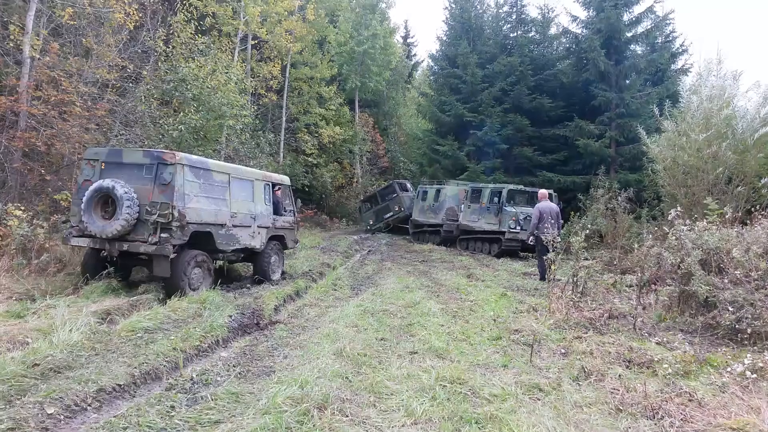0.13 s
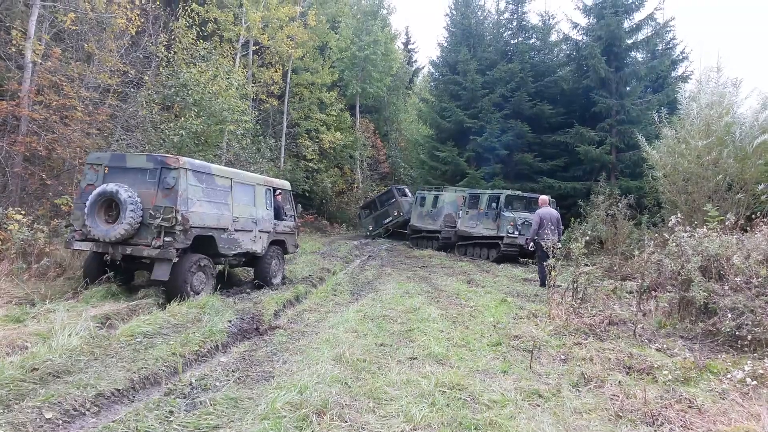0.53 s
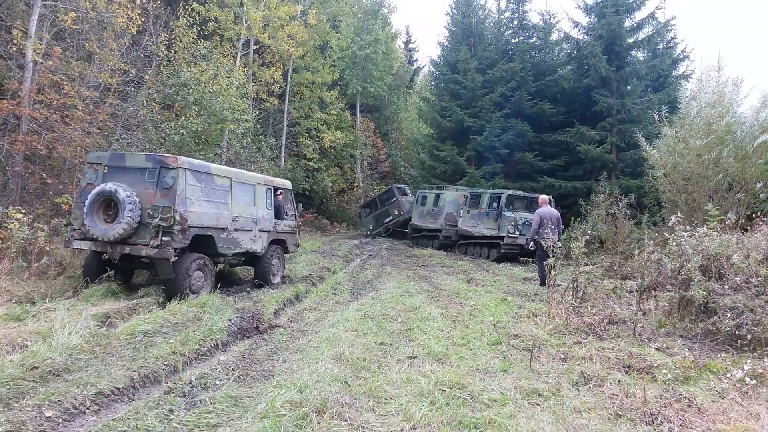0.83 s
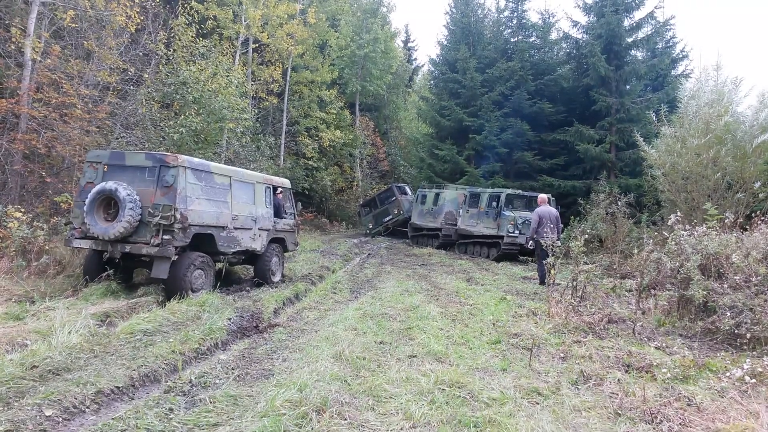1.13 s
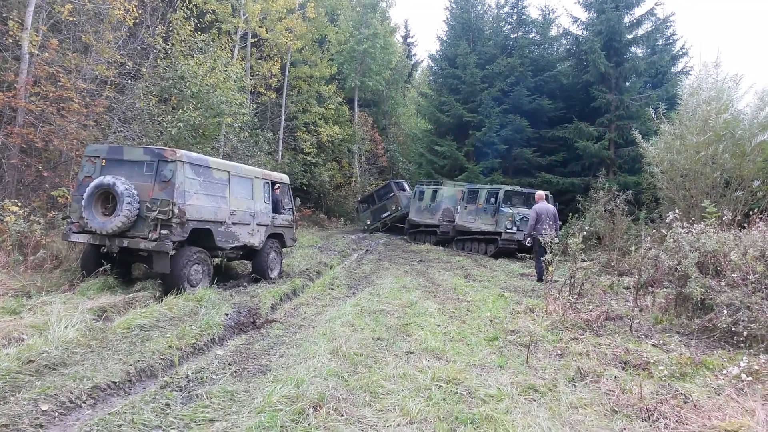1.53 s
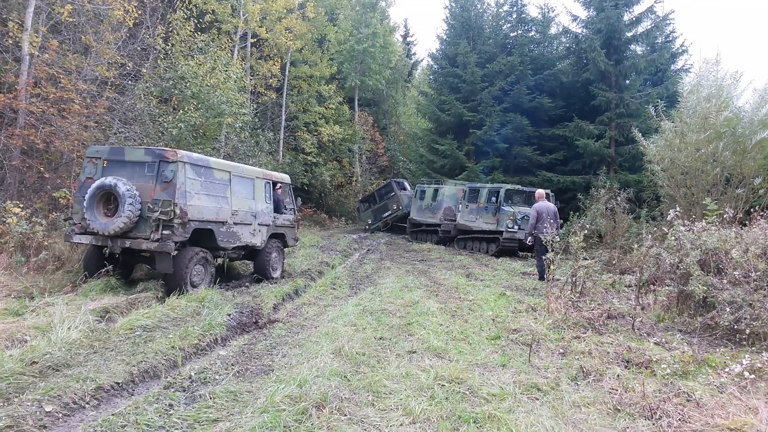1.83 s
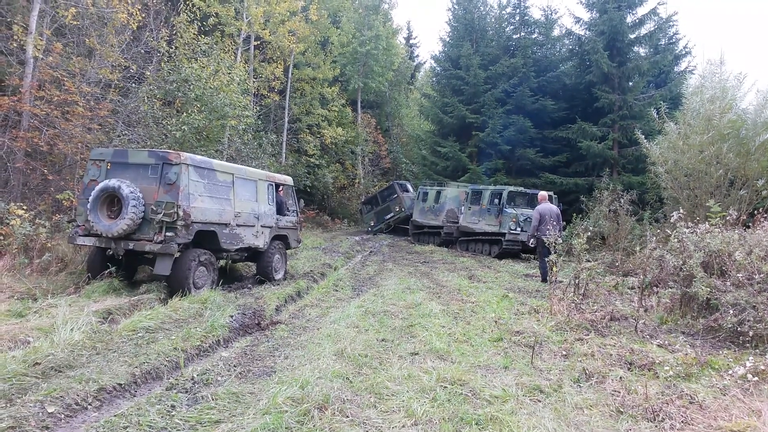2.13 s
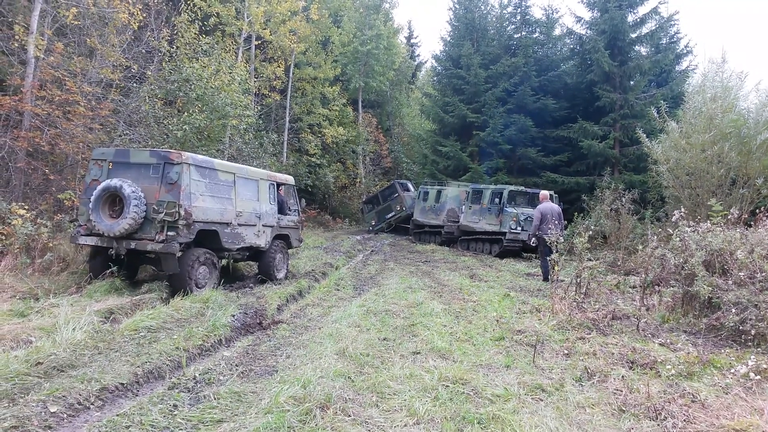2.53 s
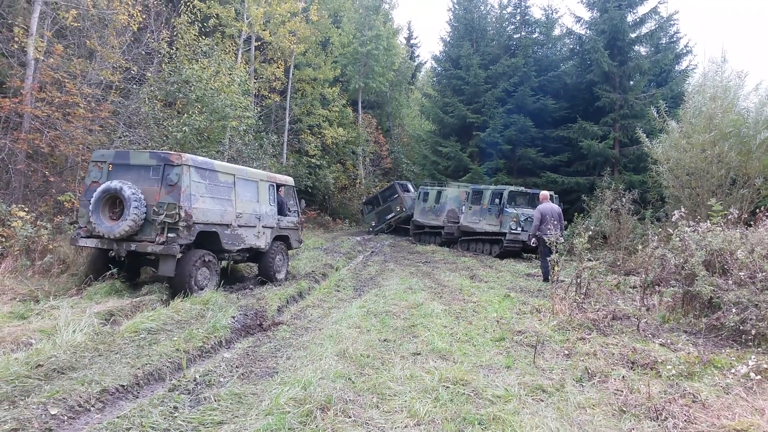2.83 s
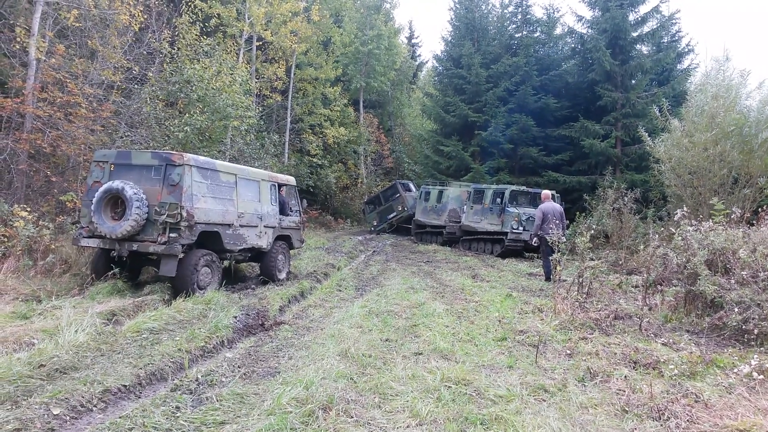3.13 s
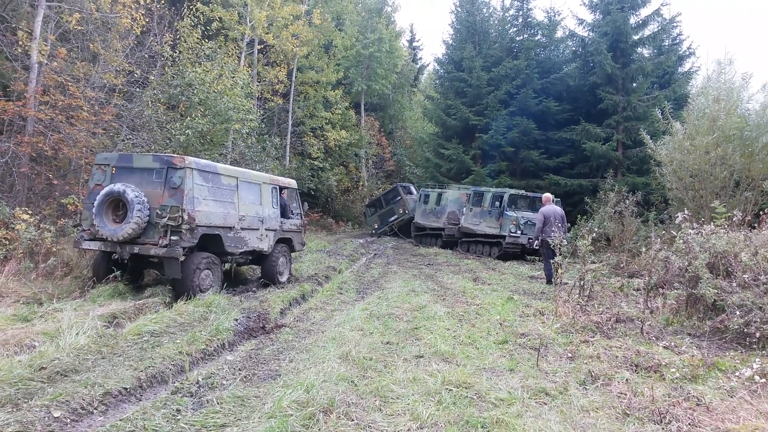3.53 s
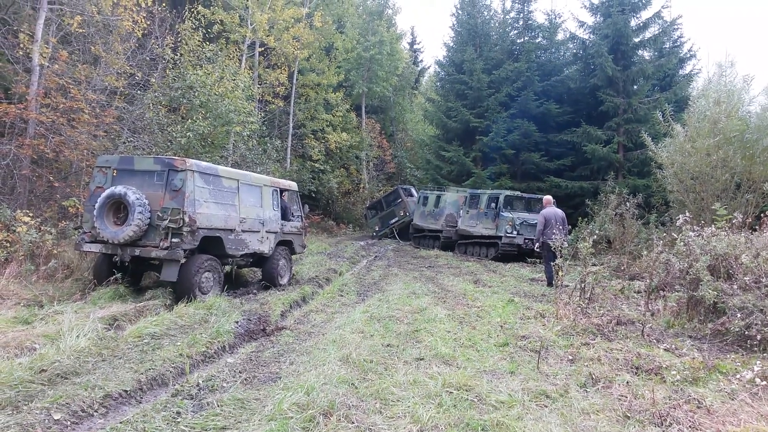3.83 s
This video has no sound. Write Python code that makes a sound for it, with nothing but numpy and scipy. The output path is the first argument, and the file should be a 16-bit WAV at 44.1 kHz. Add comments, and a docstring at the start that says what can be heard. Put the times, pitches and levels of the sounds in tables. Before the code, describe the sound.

Truck engine picks up revs with a deep throbbing exhaust and holds a clattering fast idle.

```python
"""Six-cylinder truck revving up

A six-cylinder truck picks up revs and settles to a fast idle; the sound fades in from silence.
Exhaust puffs ring a pipe, valve ticks ring the engine block, shaped noise makes the fan and intake roar.
One jolt per engine cycle hums in a body panel, and gliding sines swell the bass.
A second engine further off is a few sine orders, under a wide bright hiss that flutters at its rate."""
import sys
import numpy as np
from scipy import signal
from scipy.fft import rfft, irfft, next_fast_len
from scipy.io import wavfile
from scipy.ndimage import map_coordinates

SR = 44100
rng = np.random.default_rng(int(sys.argv[2]) if len(sys.argv) > 2 else 0)


def put_to_file(sound):
    """Save the sound as 16-bit audio at rate SR, in the file named by the first command-line argument."""
    columns = np.atleast_2d(sound).T  # one column per channel
    safe = np.clip(columns, -1, 1)
    whole_steps = np.round(safe * 32767)
    wavfile.write(sys.argv[1], SR, whole_steps.astype(np.int16))


N = 176400  # samples: 4 s

# The truck's cylinders in firing order.
# Each row: strength in dB, delay on the way to the pipe in seconds, both scaled by the unevenness.
CYLINDER_ROWS = [(-0.3, 0.00066), (-0.8, 0.0021), (-2.6, 0.001), (-0.8, 0.0032), (-0.1, 0.00082),
                 (-4, 0.002)]


def amp(db):
    """Decibels to gain."""
    return 10 ** (np.asarray(db) / 20)


def unit(x):
    """Scale to rms 1."""
    return x / np.sqrt(np.mean(x ** 2) + 1e-20)


def along(points, hz):
    """Read (Hz, value) points at hz, on a log frequency axis."""
    f, v = np.transpose(points)
    return np.interp(np.log(hz + 1), np.log(f + 1), v)


def curves(rows):
    """One value per sample for each column after the time."""
    s, *cols = np.transpose(rows)
    return [np.interp(np.arange(N) / SR, s, c) for c in cols]


def wobble(rate):
    """A smooth random curve, rate knots a second."""
    knots = rng.standard_normal(int(N * rate / SR) + 4)
    return map_coordinates(knots, [np.arange(N) * rate / SR])


def filtered(x, response):
    """Multiply the spectrum of x by a complex response of frequency."""
    m = 2 * next_fast_len(N // 2 + SR // 4)  # zero-padded so that tails do not wrap round
    return irfft(rfft(x, m) * response(np.fft.rfftfreq(m, 1 / SR)), m)[..., :N]


def causal(db):
    """The minimum-phase response with these gains: it rings only after each impulse."""
    cepstrum = irfft(db * np.log(10) / 20)
    half = len(cepstrum) // 2
    cepstrum[1:half] *= 2
    cepstrum[half + 1:] = 0
    return np.exp(rfft(cepstrum))


def noise(spectrum):
    """Random noise with the given (Hz, dB per Hz) spectrum."""
    white = rng.standard_normal(N) * np.sqrt(SR / 2)  # 0 dB per Hz
    return filtered(white, lambda hz: amp(along(spectrum, hz)))


def pulses(at, sizes):
    """Impulses at fractional sample positions, each shared between two samples."""
    at = np.clip(at, 0, N - 1)
    i = at.astype(int)
    early = np.bincount(i, sizes * (1 - at + i), N + 1)
    late = np.bincount(i + 1, sizes * (at - i), N + 1)
    return (early + late)[:N]


def throb(firings, depth_db, uneven_db):
    """A gain that swells once per firing, never twice alike."""
    return unit(amp(depth_db * np.cos(2 * np.pi * firings) + uneven_db * wobble(160)))


def exhaust(firings, rate, level_db, bark_db, uneven):
    """One puff per firing rings the pipe; unequal cylinders roughen it and the upper bark comes and goes."""
    # The pipe's resonances. Each row: frequency in Hz, gain in dB.
    pipe_gains = [(22, -90.5), (28, -52), (38, -27), (48, -29.5), (57, -22), (66, -18.5), (86, -27.5),
                  (100, -31), (115, -21), (132, -30.5), (150, -27.5), (170, -30), (200, -33.5), (230, -32),
                  (250, -48), (290, -41), (320, -38.5), (345, -41.5), (375, -32.8), (395, -47), (420, -49),
                  (480, -44), (560, -47.5), (640, -48), (900, -61.5), (2000, -91.5)]
    scatter_db, jitter_s, bark_hz = 0.3, .00006, 123  # random strength and timing (rms), bark's lower edge
    k = np.arange(1, int(firings[-1]) + 1)
    chance = rng.standard_normal((len(k), 2))
    cylinder = np.take(CYLINDER_ROWS, k, axis=0, mode="wrap").T
    db, lag_s = np.interp(k, firings, uneven) * cylinder
    at = np.interp(k, firings, np.arange(N)) + SR * (lag_s + jitter_s * chance[:, 0])
    # an even train at this scale would have rms 1 in each harmonic at any rate
    puffs = pulses(at, amp(db + scatter_db * chance[:, 1])) * SR / rate / np.sqrt(2)
    pipe = filtered(puffs, lambda hz: causal(along(pipe_gains, hz)))
    bark = filtered(pipe, lambda hz: 1 - 1 / (1 + (hz / bark_hz) ** 6))
    return amp(level_db) * (pipe + (amp(bark_db) - 1) * bark)


def valves(firings, scatter_db):
    """The same uneven row of ticks in every engine cycle rings the block, with a little noisy scrape."""
    # The valve train. Each row: place in the engine cycle 0-1, tick strength in dB.
    tick_rows = [(.065, 0.5), (.18, -4.5), (.24, -2.5), (0.346, 0.5), (0.416, -2), (.485, 2), (.555, -4.5),
                 (0.679, -.5), (.72, 1.5), (.78, -10), (.905, -1.5)]
    # Ringing of the engine block. Each row: frequency in Hz, width in Hz, relative gain in dB.
    block_modes = [(1026, 35, 1), (1214, 70, -2.5), (1251, 34, 2), (1600, 36, -1), (1709, 30, -0.5),
                   (1860, 48, 4), (1971, 67, 0.5), (2320, 31, -0.5), (2590, 65, -7), (3840, 650, -12),
                   (4430, 230, -8), (4650, 72, -4.5)]
    valve_db, tick_s, scrape_share = -35.5, 0.0023, 0.087  # level, decay time and amount of the scrape
    cycles = firings / len(CYLINDER_ROWS)
    place, db = np.transpose(tick_rows)
    turns = np.arange(int(cycles[-1]) + 1)[:, None] + place
    sizes = amp(db + scatter_db * rng.standard_normal(turns.shape))
    sizes = sizes * (turns < cycles[-1])  # no ticks past the end
    ticks = pulses(np.interp(turns.ravel(), cycles, np.arange(N)), sizes.ravel())
    decays = signal.lfilter([1], [1, -np.exp(-1 / (tick_s * SR))], ticks)
    scrape = decays * rng.standard_normal(N)

    def block(f):
        """Sum of resonances with alternating sign."""
        total = 0
        for k, (centre, width, db) in enumerate(block_modes):
            loss = 1j * f * width
            total = total + (-1) ** k * amp(db) * loss / (centre * centre - f * f + loss)
        return total

    return amp(valve_db) * unit(filtered(ticks + scrape_share * scrape, block))


def roar(firings, lope_db):
    """Rush of fan and intake: shaped noise that throbs per firing and lopes once per engine cycle."""
    # Each row: frequency in Hz, density in dB per Hz.
    rush_spectrum = [(20, -92), (45, -76), (100, -59), (160, -54), (220, -59), (280, -60.5), (370, -61),
                     (480, -63), (650, -63.5), (880, -70), (1150, -67), (1450, -69), (1800, -66),
                     (2300, -74), (3200, -74.5), (6000, -85), (9000, -115)]
    return noise(rush_spectrum) * amp(lope_db) * throb(firings, depth_db=0.5, uneven_db=-0.1)


def far_engine(firings, waver_db):
    """Only the lowest orders of the further engine carry: sines whose levels waver."""
    # Each row: multiple of the firing rate, level in dB.
    orders = [(1, -28), (2, -39.5), (3, -57.5)]
    total = 0
    for multiple, db in orders:
        level = np.sqrt(2) * amp(db + waver_db * wobble(4.97))
        total = total + level * np.sin(2 * np.pi * multiple * firings)
    return total


def hiss(far_firings, firings, swell_db):
    """Separate noise at each side flutters at the further engine's rate; the left throbs with the truck too."""
    # Hiss at each side. Each row: frequency in Hz, density in dB per Hz.
    left_spectrum = [(100, -89), (800, -75), (1500, -67.5), (2500, -68.5), (3000, -67), (3600, -61.5),
                     (4300, -58), (4900, -66.5), (5400, -64.5), (5900, -79), (7000, -79.5), (8200, -86.5),
                     (9500, -98), (10500, -120)]
    right_spectrum = [(100, -66), (800, -67), (2500, -78.5), (3600, -75.5), (4150, -91), (4700, -63),
                      (4950, -79), (5500, -68.5), (6100, -75), (6500, -69.5), (7300, -80), (8400, -74),
                      (9000, -71), (9500, -66), (10500, -72), (11500, -76.5), (12500, -82), (13200, -109)]
    # Share of the truck's mechanical swell, in dB, that the hiss follows: left, right.
    follows = [0.72, 0.15]
    left = noise(left_spectrum) * throb(far_firings, depth_db=1.25, uneven_db=.5)
    left = left * throb(firings, depth_db=0.8, uneven_db=0.53)
    right = noise(right_spectrum) * throb(far_firings, depth_db=1.45, uneven_db=0.88)
    return np.array([left, right]) * amp(np.outer(follows, swell_db))


def booms():
    """The bass swells briefly as the revs rise and again as they fall: gliding sines in bell-shaped swells."""
    # Each row: centre in seconds, width in seconds, pitch in Hz, glide in Hz per second, peak level in dB.
    swells = [(0.54, 0.061, 82, -5, -23), (1.154, 0.12, 77, 99, -21), (2.3, 0.16, 71.2, 6, -24)]
    total = 0
    for s, width, hz, glide, db in swells:
        t = np.arange(N) / SR - s
        bell = np.exp(-(t / width) ** 2)
        total = total + np.sqrt(2) * amp(db) * bell * np.sin(2 * np.pi * t * (hz + glide * t / 2))
    return total


def panel(firings):
    """One jolt per engine cycle sets a body panel humming; the hum sinks at the top of the revs."""
    # Each row: time in seconds, level of the hum in dB.
    hum_level = [(.6, -61), (.75, -40), (1.05, -38.5), (1.3, -56), (1.9, -55), (2.1, -40), (2.32, -36.5),
                 (2.6, -40), (4, -41.5)]
    pitch_hz, width_hz, place = 369.3, 28, 0.2002  # place of the jolt in the engine cycle 0-1
    cycles = firings / len(CYLINDER_ROWS)
    turns = np.arange(int(cycles[-1])) + place
    jolts = pulses(np.interp(turns, cycles, np.arange(N)), np.ones(len(turns)))

    def ring(f):
        """The same resonance twice over, so the hum builds up softly."""
        loss = 1j * f * width_hz
        return (loss / (pitch_hz ** 2 - f * f + loss)) ** 2

    return amp(curves(hum_level)[0]) * unit(filtered(jolts, ring))


def scene():
    """Both engines sit near the middle and beat against each other; the hiss is wide."""
    # The truck's revs. Each row: time in seconds, firing rate in Hz.
    truck_speed = [(.42, 33.5), (.55, 39), (.7, 49.8), (.8, 55), (1, 61.5), (1.17, 65.8), (1.45, 66.9),
                   (1.7, 65.8), (2, 64.1), (2.4, 60.6), (2.7, 58.4), (3, 57.2), (3.5, 57.6), (4, 58)]
    # The further engine's revs. Each row: time in seconds, firing rate in Hz.
    far_speed = [(.42, 81.1), (.7, 79.3), (1.15, 77.4), (1.9, 76.6), (2.8, 76.5), (3.2, 78.1), (4, 79.9)]
    # How the truck works. Each row: time in seconds, exhaust level in dB, extra level of its upper bark
    # in dB, level of the mechanical noise in dB, unevenness of the cylinders (0 even, 1 as in their rows).
    effort = [(.45, -13.5, -4.5, -4, 0.56), (.6, -5, -6.5, -2.5, 0.48), (.7, 5, -2, -2.5, 0.24),
              (.8, 1.5, 0.5, -1.5, 0.28), (.92, -0.5, -3.5, 0.6, 0.86), (1.05, 3, -2.5, 1, 0.72),
              (1.2, -1.7, 2, 1.2, 1.15), (1.5, -1.5, 2.5, 2.5, 1.23), (2, -1.3, 2, 1, 1.15),
              (2.45, 0.5, -2, 0, 1.05), (3, -0.5, 0, 0, 0.82), (4, -1, 1, 0.9, 0.93)]
    # Stereo placing of the engines. Each row: frequency in Hz, left minus right in dB.
    side_balance = [(60, -2.05), (140, -3.5), (320, -4.5), (740, -1.5), (1200, -4), (1900, -1), (4000, -7)]
    lope_depth_db, lope_place = 0.45, 0.52  # swell of roar and hiss, its place in the engine cycle 0-1

    rate, = curves(truck_speed)
    firings = np.cumsum(rate) / SR
    far_firings = np.cumsum(curves(far_speed)[0]) / SR
    level_db, bark_db, machine_db, uneven = curves(effort)
    lope_db = lope_depth_db * np.cos(2 * np.pi * (firings / len(CYLINDER_ROWS) - lope_place))

    engines = exhaust(firings, rate, level_db, bark_db, uneven)
    machine = valves(firings, scatter_db=0.5) + roar(firings, lope_db)
    engines = engines + amp(machine_db) * machine
    engines = engines + far_engine(far_firings, waver_db=0.8) + panel(firings) + booms()
    halves = np.array([[.5], [-.5]])  # left gains half the difference, right loses half
    placed = filtered(engines, lambda hz: amp(along(side_balance, hz) * halves))
    return placed + hiss(far_firings, firings, machine_db + lope_db)


def record(dry):
    """A short fade from silence, and a steep cut of the extreme treble."""
    start_s, fade_s, shape, top_hz = 0.42, 0.11, 0.72, 13400  # nothing passes above top_hz
    fade = np.clip((np.arange(N) / SR - start_s) / fade_s, 0, 1) ** shape
    return filtered(dry * fade, lambda hz: np.clip((top_hz - hz) / 200, 0, 1))


dry = scene()
out = record(dry)
put_to_file(out)
```